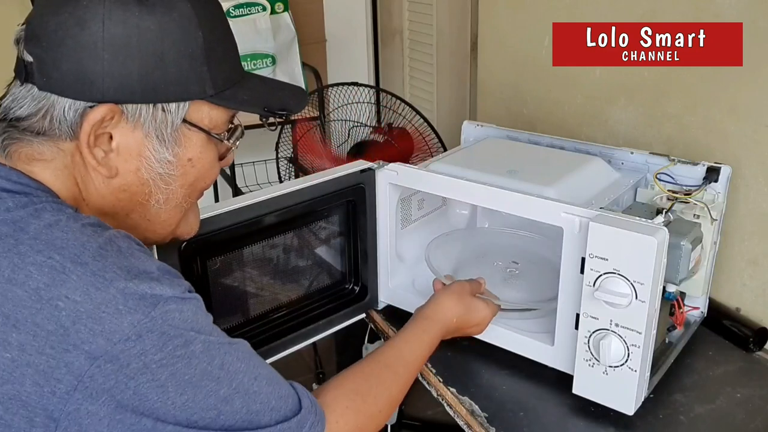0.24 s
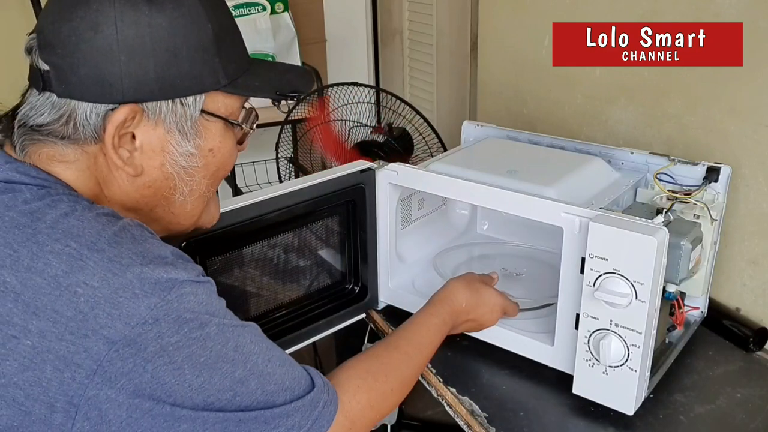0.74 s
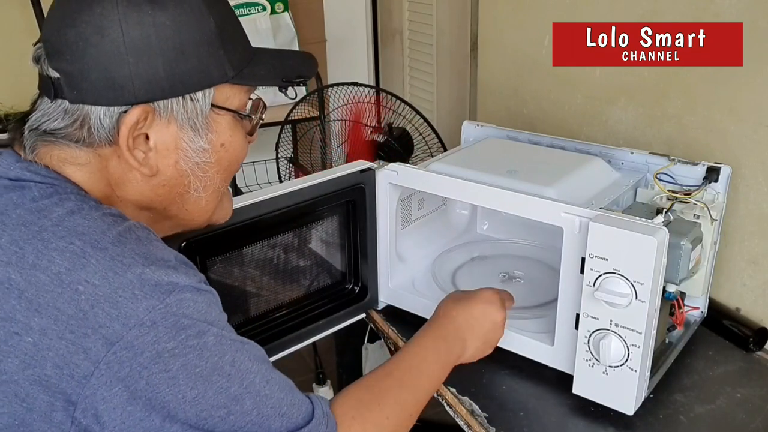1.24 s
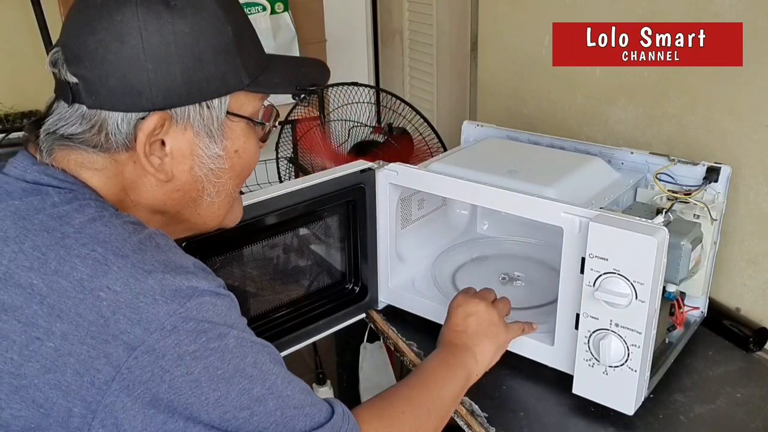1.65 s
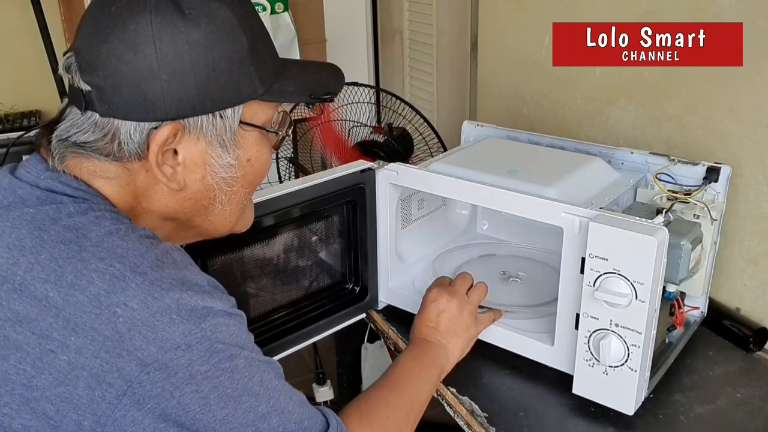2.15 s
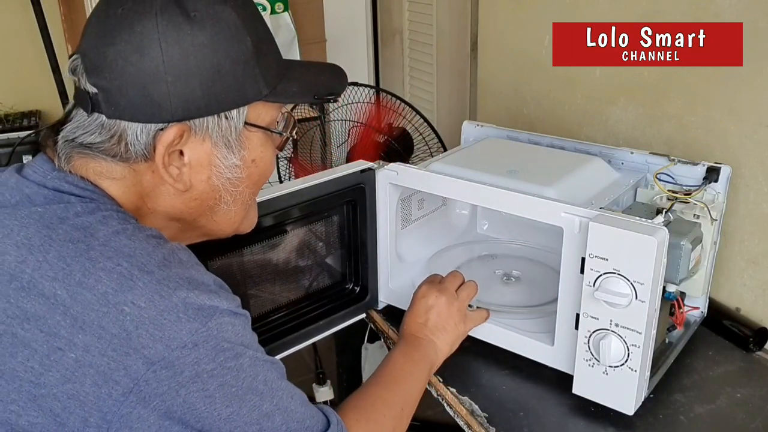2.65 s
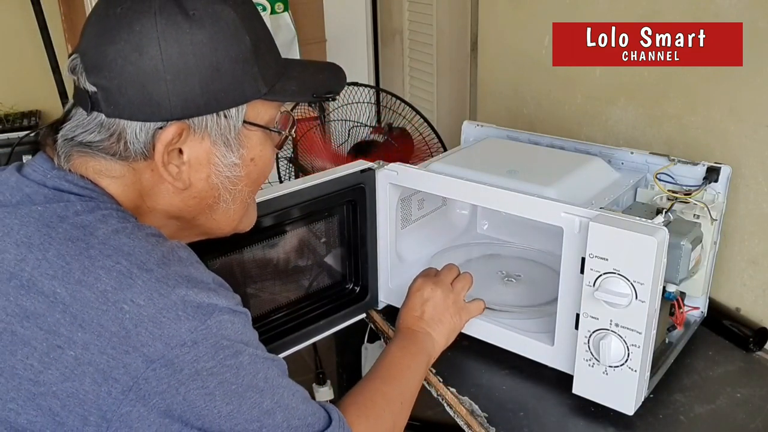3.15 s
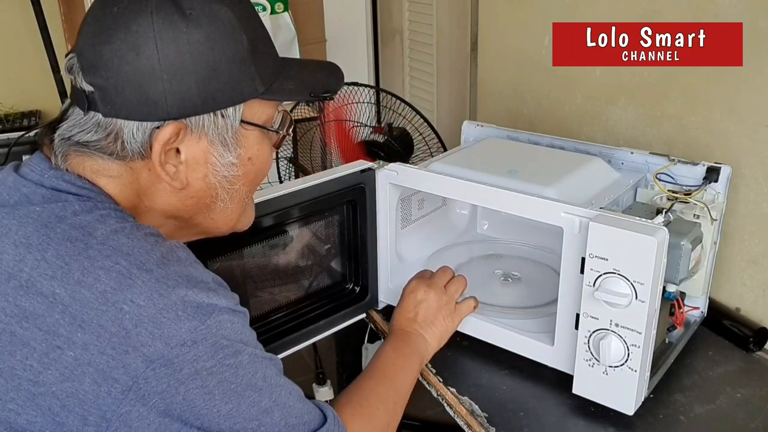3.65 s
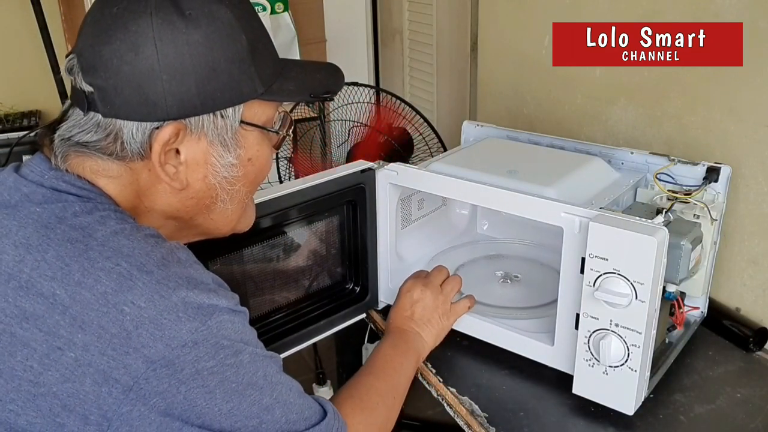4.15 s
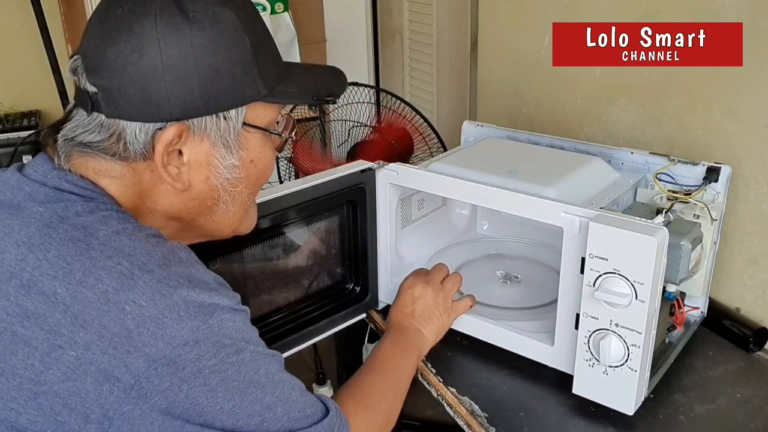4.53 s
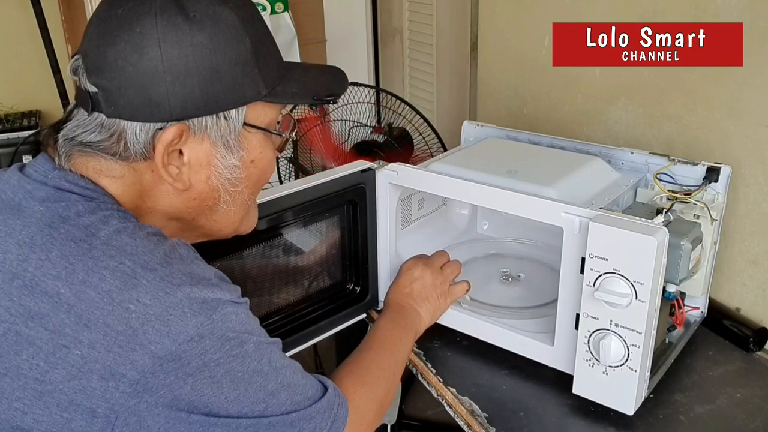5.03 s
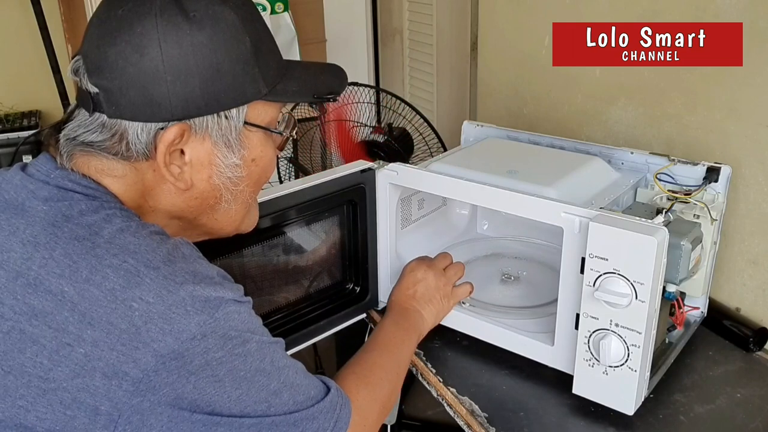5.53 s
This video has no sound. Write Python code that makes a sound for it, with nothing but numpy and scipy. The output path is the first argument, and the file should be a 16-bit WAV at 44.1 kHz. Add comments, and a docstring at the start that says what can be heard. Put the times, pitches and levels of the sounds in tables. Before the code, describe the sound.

A glass turntable tray clacks loudly into an open microwave oven, then rattles and ticks into place over a soft fan rush.

```python
"""An electric fan rushes softly; then a glass turntable tray clacks down in an open microwave oven.
It is shuffled about on its roller ring until it seats, with faint nudges between the blows.
Each blow is a short chattering force that rings the glass modes and drums the sheet-steel cavity.
Single notes stand out of some blows, and a small room answers with dying noise.
"""
import sys
import numpy as np
from scipy import signal
from scipy.fft import rfft, irfft
from scipy.io import wavfile
from scipy.ndimage import uniform_filter1d

SR = 44100
rng = np.random.default_rng(int(sys.argv[2]) if len(sys.argv) > 2 else 0)


def output_pcm(signal):
    """Save a mono or channel-first signal as 16-bit PCM at the path in sys.argv[1].

    Samples are clipped to [-1, 1] before scaling.
    """
    pcm = np.clip(np.atleast_2d(signal).T, -1, 1) * 32767
    wavfile.write(sys.argv[1], SR, np.round(pcm).astype(np.int16))


N = 254898  # length of the scene in samples
RING_SIZE = 16384  # length of one blow's ringing in samples


def amp(db):
    """Turns decibels into a gain."""
    return 10 ** (np.asarray(db) / 20)


def rms(x):
    """Average strength along time (root mean square)."""
    return np.sqrt(np.mean(x ** 2, axis=-1, keepdims=True) + 1e-20)


def read(points, hz):
    """Reads a curve of (pitch, value) points, joined by lines on a log-pitch axis."""
    f, value = np.transpose(points)
    return np.interp(np.log(hz + 1), np.log(f + 1), value)


def add(mix, start_s, sound):
    """Mixes a sound in at a start time, cutting it off at the end of the mix."""
    part = mix[max(round(start_s * SR), 0):][:len(sound)]
    part += sound[:len(part)]


def ring(hz, db, t60, size=RING_SIZE):
    """One mode: a sine that falls by 60 dB in t60 seconds."""
    t = np.arange(size) / SR
    decay = np.exp(-np.log(1000) * t / t60)
    return amp(db) * decay * np.sin(2 * np.pi * hz * t)


def dying_noise(t60_points):
    """Countless close resonances: noise whose pitch bands each die at their own speed; energy 1."""
    hz, t, z = signal.stft(rng.standard_normal(RING_SIZE), SR, nperseg=256)
    t60 = read(t60_points, hz)[:, None]
    tail = signal.istft(z * amp(-60 * t / t60), SR)[1][:RING_SIZE]
    return tail / np.linalg.norm(tail)


def causal(gain):
    """Filter response with the given gains that rings only after the blow (minimum phase)."""
    both_sides = np.concatenate([gain, gain[-2:0:-1]])
    log_gain = np.log(np.maximum(both_sides, 1e-9))
    return np.exp(np.conj(signal.hilbert(log_gain))[:len(gain)])


# tone of the fan's rush, only the shape counts: pitch_hz [Hz], level_db [dB per Hz]
FAN_TONE = [(25, -38), (58, 6), (90, -8), (125, -2.5), (170, -15), (320, -7), (520, -14), (1250, -12.5),
            (1700, -11.5), (3000, -24), (6200, -37.5), (10500, -43), (12300, -50.5), (15500, -57)]
FAN_DB = -47.5  # average strength of the rush


def fan(patchy_db=0.1, swell_db=2.2):
    """Rushing air: shaped noise with drifting patches and a slow swell of the whole rush."""
    hz, t, z = signal.stft(rng.standard_normal(N), SR, nperseg=2048, noverlap=1536)
    patches = uniform_filter1d(rng.standard_normal(z.shape), size=10, axis=1)  # smooth in time
    patches = uniform_filter1d(patches, size=16, axis=0)  # smooth in pitch
    swell = uniform_filter1d(rng.standard_normal(len(t)), size=30)
    drift_db = patchy_db * patches / patches.std() + swell_db * swell / swell.std()
    z *= amp(read(FAN_TONE, hz)[:, None] + drift_db)
    air = signal.istft(z, SR, nperseg=2048, noverlap=1536)[1][:N]
    return amp(FAN_DB) * air / rms(air)


# how long the room rings on: pitch_hz [Hz], t60_s [s]
ROOM_DECAY = [(100, 0.63), (300, 0.53), (1000, 0.37), (3000, 0.3), (7000, 0.2), (14000, 0.33)]


def room(x, wet_db=-11, delay_s=0.012):
    """The walls' blurred answer: the knocks smeared by dying noise, a moment later."""
    out = np.zeros(N)
    answer = signal.fftconvolve(x, dying_noise(ROOM_DECAY))[:N]
    add(out, delay_s, amp(wet_db) * answer)
    return out


# single notes of the rim or oven floor that stand out of a blow: start_s [s], pitch_hz [Hz], level_db [dB]
STANDOUT_NOTES = [(.306, 1779, -29), (.306, 321.7, -33.5), (.922, 3620, -40), (1.19, 5053, -40),
                  (1.37, 3400, -29), (1.398, 4970, -25.5), (1.532, 3400, -25.5), (1.925, 3360, -18.5),
                  (2.034, 5053, -33), (2.095, 4930, -34), (2.37, 2793, -17.5), (2.582, 2767, -21),
                  (2.6, 3410, -30), (3.043, 3370, -31), (3.206, 787, -11.5), (3.412, 832, -21.5),
                  (3.474, 3445, -40), (4.066, 3370, -35), (4.189, 255, -24.5), (4.722, 3470, -31)]
# the tray is held up until it lies on its rollers, which damp it (s)
LIES_FROM_S, FREE_T60_S, DAMPED_T60_S = 1.0, 0.71, 0.083
SPLIT = 0.0243  # the rollers split a note into close ones, up to about this share of its pitch away


def tings(rise_s=0.00032, count=3):
    """Notes that outlast the blow: pure and long while the tray is held, short and beating once it lies."""
    out = np.zeros(N)
    onset = 1 - np.exp(-np.arange(SR) / SR / rise_s)
    detunes = rng.uniform(-0.98, 1, (len(STANDOUT_NOTES), count))
    for (start_s, hz, db), detune in zip(STANDOUT_NOTES, detunes):
        if start_s < LIES_FROM_S:
            note = ring(hz, db, FREE_T60_S, size=SR)
        else:
            note = np.zeros(SR)
            for k, pitch in enumerate(hz * (1 + SPLIT * np.sort(detune))):
                note += (-1) ** k * ring(pitch, db, DAMPED_T60_S, size=SR)  # neighbours start opposite
            note /= np.sqrt(count)
        add(out, start_s, onset * note)
    return out


# tone of the steel cavity's crowded resonances, only the shape counts: pitch_hz [Hz], level_db [dB per Hz]
CAVITY_TONE = [(30, -52), (90, -19.5), (170, -9.5), (300, -4), (420, -6), (560, -10.5), (1000, -8),
               (1400, -2), (3000, -14.5), (4100, -17), (4900, -22), (5500, -22.5), (9000, -29.5),
               (11500, -49), (15500, -77)]
# how long the cavity rings: pitch_hz [Hz], t60_s [s]
CAVITY_DECAY = [(100, 0.23), (300, 0.25), (800, 0.22), (2000, 0.18), (5000, 0.099), (12000, 0.089)]


def cavity(hz, crack=0.72, crack_s=0.007, count=8):
    """The steel box struck at a few places: dying noise, shaped by the cavity's tone."""
    # the first wave comes straight out of the door, so the start is stronger
    direct = 1 + crack * np.exp(-np.arange(RING_SIZE) / SR / crack_s)
    noises = rfft([direct * dying_noise(CAVITY_DECAY) for _ in range(count)])
    places = irfft(noises * causal(amp(read(CAVITY_TONE, hz))))
    return places / np.linalg.norm(places, axis=1, keepdims=True)


def contact(chatter_s, rebound=0.43, fade=0.77, grit=0.023, glancing_s=0.019, count=8):
    """Force of one blow: a first strike, then rebounds and grit while the glass settles."""
    place = (np.arange(count) + rng.random(count)) / count  # moments as shares of the chatter
    size = rng.uniform(-1.09, 1, count)
    length = chatter_s * SR + 1
    n = np.arange(RING_SIZE // 8)
    force = grit * rng.standard_normal(len(n)) * (n < length)
    # longer chatter rebounds more strongly; later rebounds are weaker
    rebounds = rebound * np.sqrt(length / SR / 0.014) * size * np.exp(-fade * place)
    np.add.at(force, np.minimum(place * length, len(n) - 1).astype(int), rebounds)
    force[0] = np.exp(-length / SR / glancing_s)  # a long, sliding contact starts softly
    return force


# borders between thump, knock, clack, clink and tick: border_hz [Hz]
REGISTER_BORDERS = (560, 1100, 2200, 4500)


def registers(hz):
    """Five overlapping pitch bands: thump, knock, clack, clink and tick."""
    below = [0 * hz]
    below += [1 / (1 + (hz / border) ** 12) for border in REGISTER_BORDERS]
    below += [1 + 0 * hz]
    return np.diff(below, axis=0)


def strength(parts, chatter_s, attack_s=0.0065, bass_attack_s=0.016):
    """Strength of each register around the contact; the low ones take longer to build up."""
    attacks_s = np.geomspace(bass_attack_s, attack_s, len(parts))
    lengths = (chatter_s + attacks_s) * SR
    return np.concatenate([rms(part[:int(length)]) for part, length in zip(parts, lengths)])


# thump, clink and tick at zero hardness, relative to the clack (dB)
THUMP_DB, CLINK_DB, TICK_DB = 0.74, -3.5, -17.5
# a harder contact is shorter: the clink gains and the thump loses a share of the hardness (dB per dB)
CLINK_SHARE, THUMP_LOSS = 0.25, 0.38


def colour(hardness_db, knock_db):
    """Register levels: hardness tips thump into clink and tick; the spot struck sets the hollow knock."""
    thump_db = THUMP_DB - THUMP_LOSS * hardness_db
    clink_db = CLINK_DB + CLINK_SHARE * hardness_db
    tick_db = TICK_DB + hardness_db
    return np.array([thump_db, knock_db, 0, clink_db, tick_db])  # the clack is the reference


# hardness tilts the top above this pitch (Hz), by this much (dB per dB of hardness per octave)
SNAP_HZ, SNAP_SHARE = 8340, 0.82


def snap(hz, hardness_db, hardest_db=7.0):
    """Tilt of the highest treble: up for a hard, short contact, down for a soft one."""
    octaves_above = np.log2(np.maximum(hz / SNAP_HZ, 1))
    return amp(SNAP_SHARE * min(hardness_db, hardest_db) * octaves_above)


# faint nudges while the fingers shift the tray: time span (s), level and spread (dB)
NUDGE_FROM_S, NUDGE_TO_S, NUDGE_DB, NUDGE_SPREAD_DB = 0.7, 5.7, -57, 3
NUDGE_HARDNESS_DB, NUDGE_CHATTER_S = -7.5, 0.032


def nudges(count=16):
    """Faint blows at random moments, one in each equal slice of the span, as fingers work the tray round."""
    when, size, hard, hollow = rng.uniform(-1, 1, (count, 4)).T
    share = (np.arange(count) + (when + 1) / 2) / count
    start_s = NUDGE_FROM_S + (NUDGE_TO_S - NUDGE_FROM_S) * share
    level_db = NUDGE_DB + NUDGE_SPREAD_DB * size
    hardness_db = NUDGE_HARDNESS_DB + NUDGE_SPREAD_DB * hard
    knock_db = NUDGE_SPREAD_DB * hollow
    return list(zip(start_s, level_db, hardness_db, knock_db, np.full(count, NUDGE_CHATTER_S)))


# blows of the tray on the roller ring and oven floor, levels before a small common trim:
# start_s [s], level_db [dB], hardness_db [dB], knock_db (hollow knock against clack) [dB], chatter_s [s]
TRAY_BLOWS = [(0.291, -48, 16, 2, 0.012), (0.306, -19.5, 8.0, -3, 0.0018), (0.419, -49, 12.5, 0, 0.0013),
              (0.5851, -16.5, 7, 0, 0.0043), (0.6, -23.0, -0.5, 5.5, 0.021), (0.671, -27.5, 10, 1, 0.0058),
              (0.688, -37.5, -24, -4, 0.01), (0.776, -54, 11, -2, 0.017), (0.909, -26.5, 6, 11.5, 0.013),
              (0.9214, -15.5, 7.5, -5.5, 0.012), (1.048, -35, -0.5, 9, 0.012), (1.067, -40, 11, 4, 0.0017),
              (1.189, -43.0, 5, 9, 0.011), (1.217, -40.5, -7, 1.5, 0.016), (1.353, -43, -5, 7, 0.018),
              (1.369, -27, 1.5, -3, 0.02), (1.398, -25.5, 7, -4, 0.008), (1.487, -34, 0, 1, 0.015),
              (1.532, -31.5, -4, -2, 0.013), (1.562, -43, -10, 1.5, 0.017), (1.743, -53, -8, 6, 0.018),
              (1.83, -58.5, -20, 11.5, 0.019), (1.874, -24.5, 5.0, 3, 0.016),
              (1.897, -26.5, 8.5, -1.5, 0.016), (1.926, -28.5, 0, -2, 0.0041),
              (1.9739, -33.5, 4.5, 5.5, 0.016), (2.033, -34.5, 6.5, 10, 0.011),
              (2.094, -35.0, -4.5, 2.5, 0.018), (2.159, -32, 4.5, 11.5, 0.00613),
              (2.165, -29, 7.5, -1.5, 0.014), (2.3699, -26.5, 5.0, -5.0, 0.0072),
              (2.408, -36, 2.5, -6, 0.00081), (2.444, -37.0, -1.5, 2.5, 0.027),
              (2.5809, -27.5, 2.5, -6.5, 0.0033), (2.597, -30.5, -4, -2, 0.03),
              (2.645, -45.5, -2, 5, 0.0016), (2.683, -32, 3, 1.5, 0.002), (2.693, -32.5, 2, 5.5, 0.012),
              (2.7443, -37, 0.5, -12, 0.0024), (2.789, -53, -3, 9, 0.013), (3.043, -32.5, -1.5, -4, 0.0045),
              (3.088, -45, -1, 3.5, 0.038), (3.2054, -27.5, 3.5, 7.5, 0.019),
              (3.41, -45.5, -12.5, 4, 0.0082), (3.428, -39.5, -3, 1.5, 0.014), (3.473, -46, -7, 2, 0.013),
              (4.064, -45.5, -6, 1.5, 0.011), (4.187, -49.5, -29.5, -0.5, 0.014),
              (4.659, -45, -0.5, -8.5, 0.0061), (4.721, -39.0, -7, -0.5, 0.014),
              (4.9, -52.5, -2.0, 6, 0.0089), (5.038, -50.5, -15, 0, 0.012), (5.4, -53.5, -5, 1.5, 0.024),
              (5.487, -46.5, -10, 2, 0.0084), (5.755, -48, -13, -22.5, 0.018)]
# modes of the glass tray, shared by all its blows, levels only against each other:
# pitch_hz [Hz], level_db [dB], t60_s [s]
TRAY_MODES = [(104.1, -18.5, .7), (126.5, -18, 0.64), (179.1, -10.5, 0.33), (204.5, -9, 0.4),
              (245.6, -3, 0.14), (276.1, -1, 0.21), (313, -25, 0.2), (384, -9, 0.16), (488, -17, 0.41),
              (656.4, -2, 0.16), (701.4, 5, 0.1), (794, 12.5, 0.085), (837.3, 4, 0.14), (1035, 1, 0.12),
              (1197, 8, 0.082), (1364, 3, 0.074), (1400, 3, 0.095), (1502, 2, 0.06), (1685, 3, 0.16),
              (1930, -4, 0.16), (2386, -11.5, 0.1), (2780, -14, 0.075), (2865, -2, 0.094),
              (3118, -1.5, 0.075), (3420, 6, 0.052), (5070, -22, .1), (5053, -11, 0.11),
              (6240, -15.5, 0.11), (8250, -22, 0.06)]


def tray(modes_db=-2.5, scatter_db=2.5, trim_db=-0.84):
    """Every blow rings the same glass and steel; where it lands sets the mix of modes and registers."""
    hz = np.fft.rfftfreq(RING_SIZE, 1 / SR)
    modes = np.array([ring(*mode) for mode in TRAY_MODES])
    modes /= np.linalg.norm(modes)
    places, bands, out = cavity(hz), registers(hz), np.zeros(N)
    for start_s, blow_db, hardness_db, knock_db, chatter_s in TRAY_BLOWS + nudges():
        # each mode starts up or down and rings more or less, depending on the spot struck
        swing = rng.choice([-1, 1], len(modes))
        mode_gains = amp(modes_db + scatter_db * rng.standard_normal(len(modes)))
        glass = (swing * mode_gains) @ modes
        where = rng.standard_normal(len(places))
        steel = where @ places / np.linalg.norm(where)
        blow = rfft(glass + steel) * rfft(contact(chatter_s), RING_SIZE)
        # even out the registers, then set each one's level by the place and hardness of the contact
        gains = amp(trim_db + blow_db + colour(hardness_db, knock_db))
        gains /= strength(irfft(bands * blow), chatter_s)
        tone = causal(gains @ bands * snap(hz, hardness_db))
        add(out, start_s, irfft(blow * tone))
    return out


def scene():
    """The tray in its oven, the room and the fan."""
    knocks = tray() + tings()
    return (knocks + room(knocks) + fan())[None]


CEILING = 0.9  # safety ceiling that keeps the loudest blows within range, before the treble limit
EDGE_HZ = 15650  # upper pitch limit of the sound


def record(dry, low_cut_hz=45):
    """The microphone thins the bass; the loudest swings are capped and the highest treble is cut."""
    high_pass = signal.butter(2, low_cut_hz, "high", fs=SR, output="sos")
    thinned = signal.sosfilt(high_pass, dry)
    capped = np.clip(thinned, -CEILING, CEILING)
    low_pass = signal.firwin(511, EDGE_HZ, window=("kaiser", 9), fs=SR)
    return signal.oaconvolve(capped, low_pass[None], "same")


dry = scene()
out = record(dry)
output_pcm(out)
```